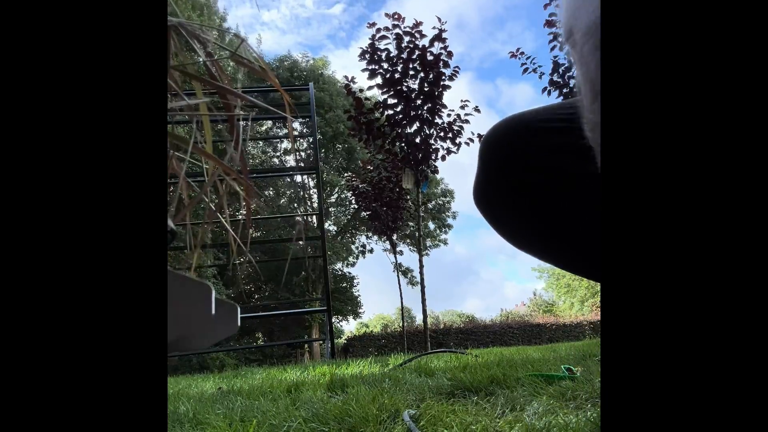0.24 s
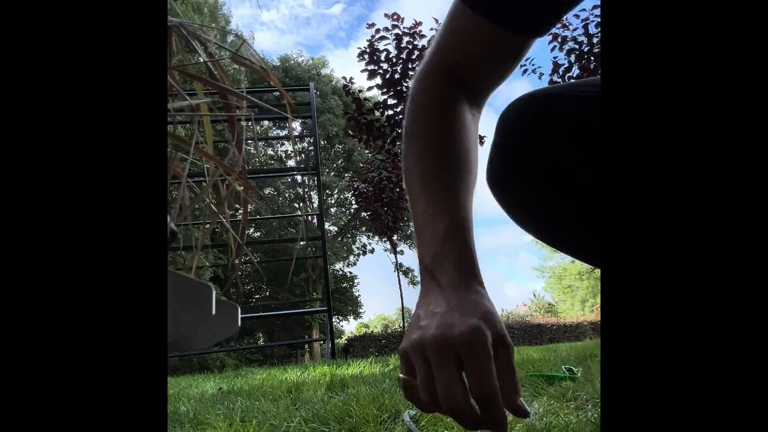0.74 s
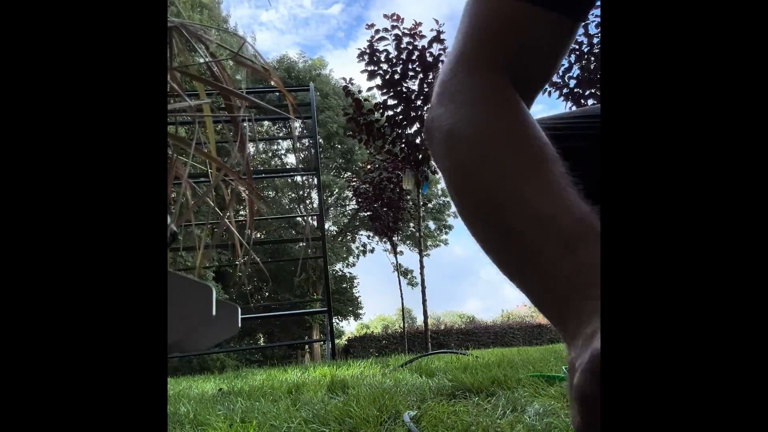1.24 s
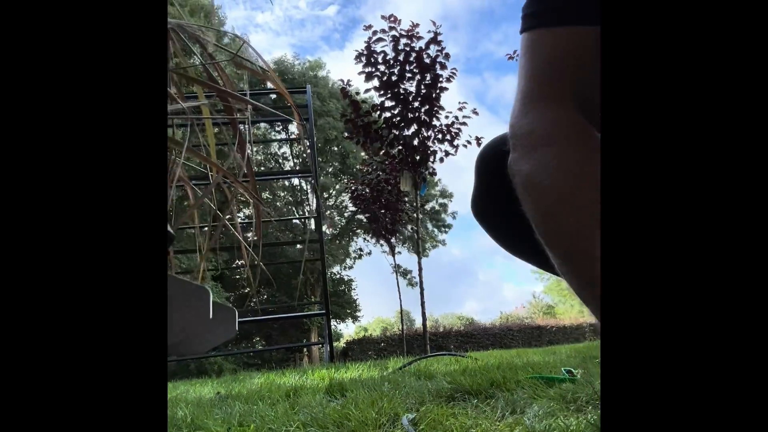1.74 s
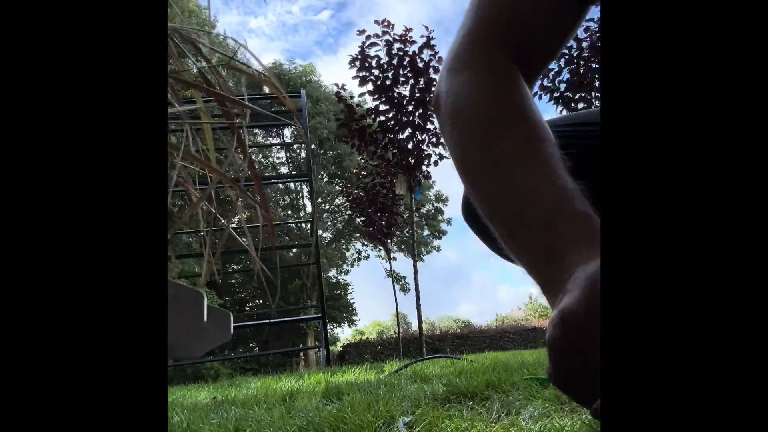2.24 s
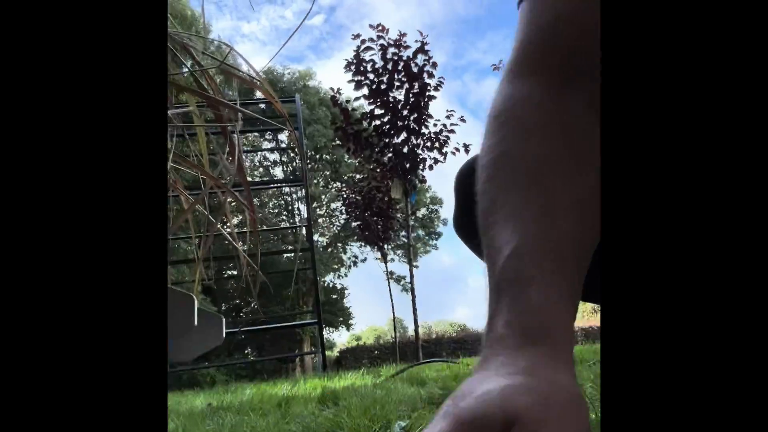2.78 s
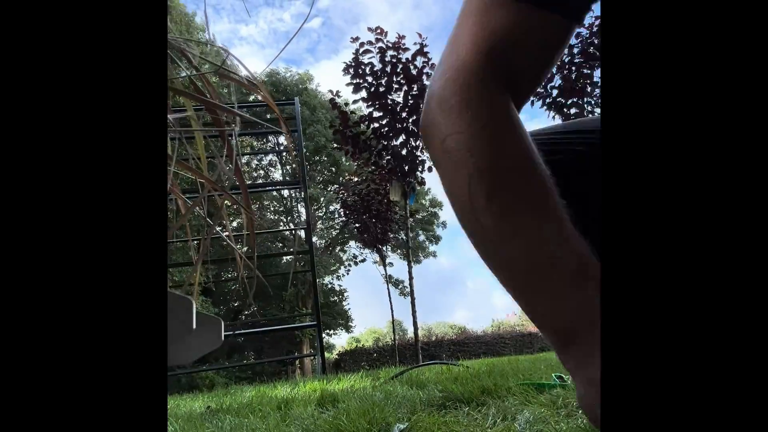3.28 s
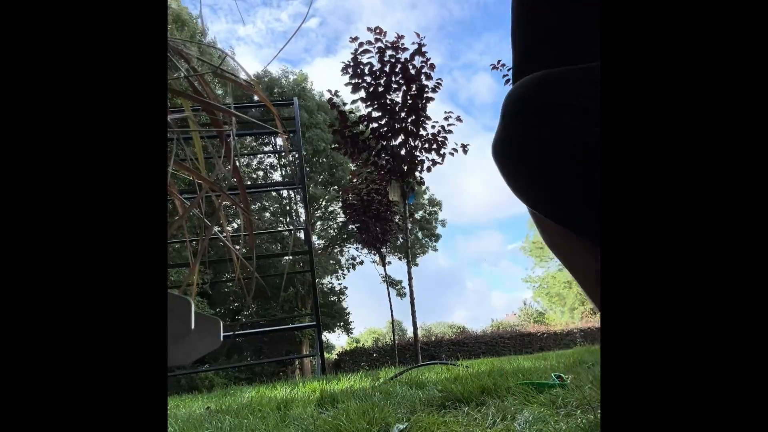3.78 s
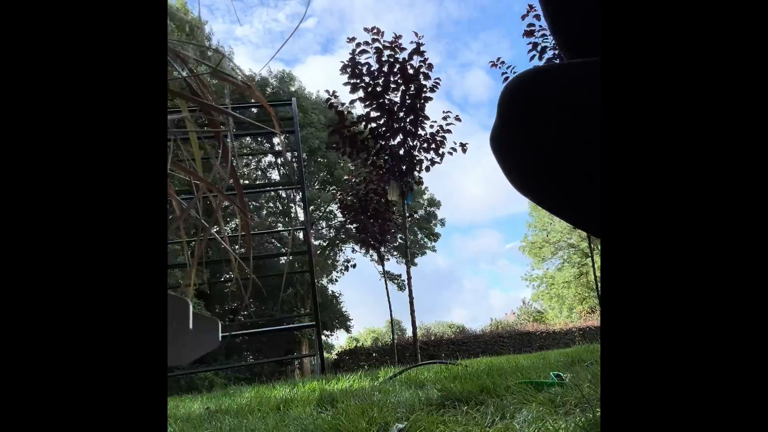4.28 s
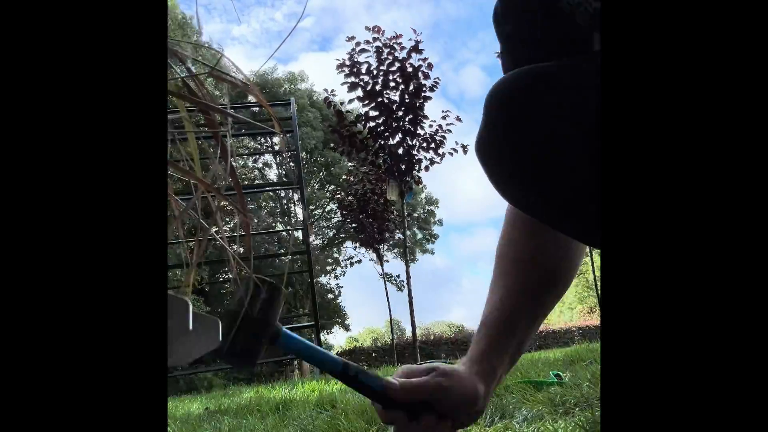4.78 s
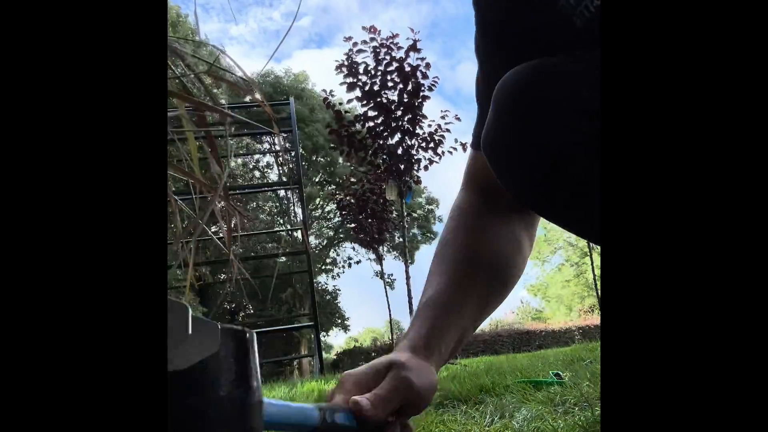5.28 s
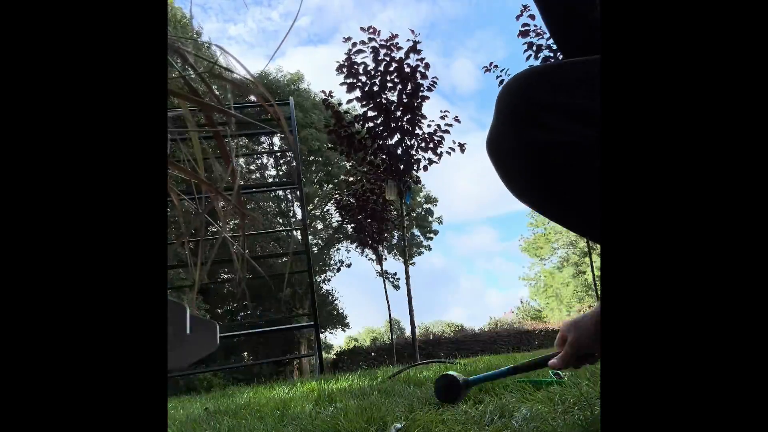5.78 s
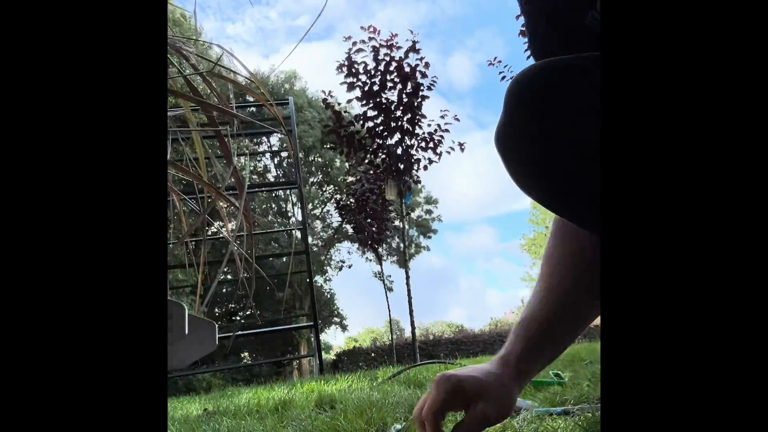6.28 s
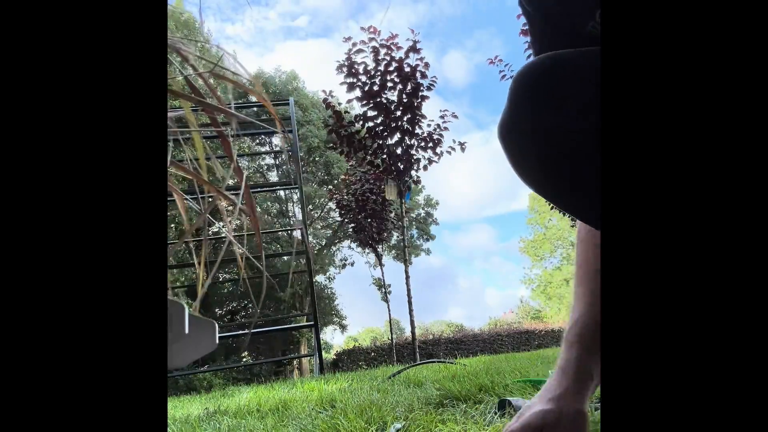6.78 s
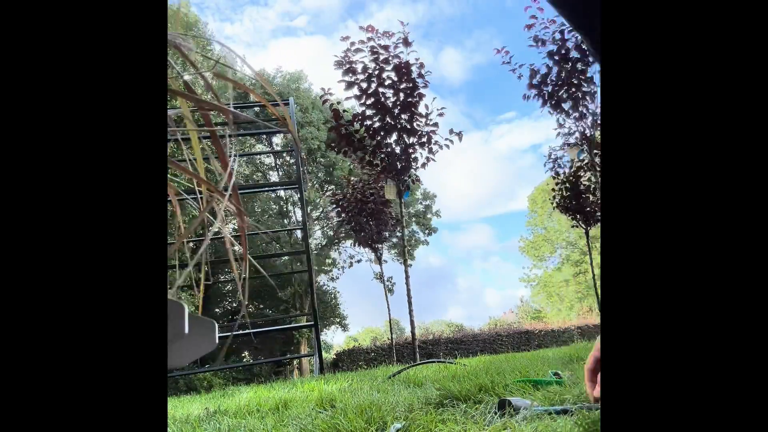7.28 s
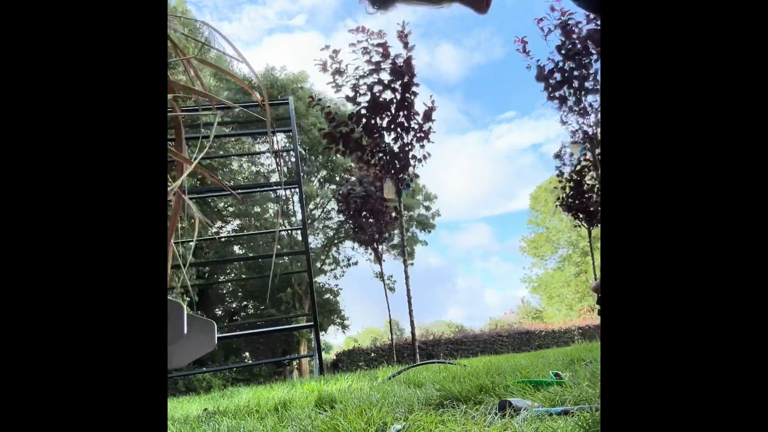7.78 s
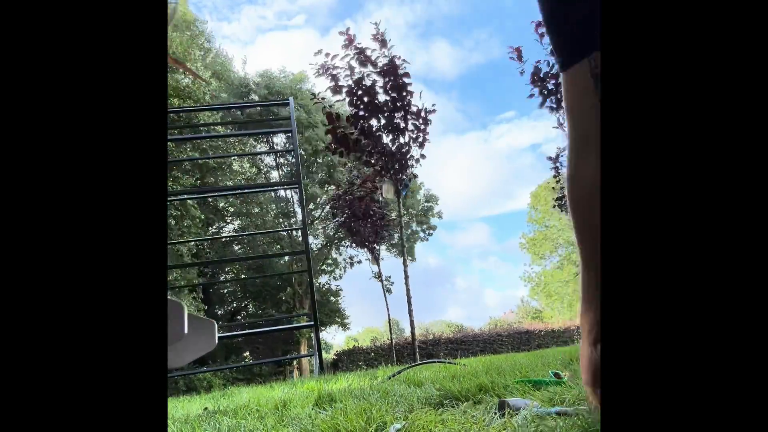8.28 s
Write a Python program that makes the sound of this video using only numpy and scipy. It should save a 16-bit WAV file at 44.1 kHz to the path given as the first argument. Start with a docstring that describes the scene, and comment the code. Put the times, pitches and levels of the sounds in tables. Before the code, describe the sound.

Quick bursts of hollow, cracking mallet blows on pegs in turf, small ticks between, then quiet grass handling and flapping wind noise at the end.

```python
"""Close to a small stereo microphone in the grass, pegs and grass first tick and rustle as clicks and grains.
Then a mallet taps plastic pegs into a lawn in quick runs: each blow rings modes of peg and head as a dry
crack, a snap and a hollow knock, with noisy crunch and a sagging thud of turf; ticks and soft pats fall between.
Fainter ticks and strokes follow; at the end a gust buffets the ports as low noise, swings and flaps.
Far traffic and leaves, bands of flickering noise, last throughout."""
import sys
import numpy as np
from scipy import signal
from scipy.io import wavfile
from scipy.ndimage import uniform_filter1d

SR = 44100
rng = np.random.default_rng(int(sys.argv[2]) if len(sys.argv) > 2 else 0)


def unload_wav(signal):
    """Save mono or channel-first audio to the path in sys.argv[1] as 16-bit WAV at rate SR, clipped to [-1, 1]."""
    wavfile.write(
        sys.argv[1],
        SR,
        np.round(np.clip(np.atleast_2d(signal).T, -1, 1) * 32767).astype(np.int16),
    )


N = 376589  # samples


def from_db(db):
    """Logarithmic level: decibels to amplitude gain."""
    return 10 ** (np.asarray(db) / 20)


def rms_one(x):
    """Energy normalisation: scale all channels together to rms 1."""
    return x / np.sqrt(np.mean(x ** 2) + 1e-20)


def peak_one(x):
    """Peak normalisation: scale each channel to peak 1."""
    return x / np.abs(x).max(-1, keepdims=True)


def level_in_time(rows, outside_db=None):
    """Linear interpolation of level: one value in dB for each sample."""
    time_s, level_db = np.transpose(rows)
    return np.interp(np.arange(N) / SR, time_s, level_db, outside_db, outside_db)


def at_hz(points, hz):
    """Logarithmic frequency: read a spectrum between its points on a log axis."""
    point_hz, value = np.transpose(points)
    return np.interp(np.log(hz), np.log(point_hz), value)


def band(x, low_hz, high_hz):
    """Band limitation: a Butterworth band-pass."""
    return signal.sosfilt(signal.butter(2, [low_hz, high_hz], "band", fs=SR, output="sos"), x)


def drift(corner_hz):
    """Low-passed chance: noise through two equal poles, drawn every 40 samples and scaled to rms 1."""
    step, settle = 40, 2000
    pole = np.exp(-2 * np.pi * corner_hz * step / SR)
    steps = rng.standard_normal(N // step + settle + 2)
    slow = signal.lfilter([1], [1, -2 * pole, pole * pole], steps)[settle:]
    return np.interp(np.arange(N) / step, np.arange(len(slow)), rms_one(slow))


def ring(x, hz, t60_s):
    """Damped resonance: one mode that decays by 60 dB in its t60."""
    radius = from_db(-60 / (t60_s * SR))
    angle = 2 * np.pi * hz / SR
    return signal.lfilter([0, np.sin(angle)], [1, -2 * radius * np.cos(angle), radius * radius], x)


def contact(rise_ms, alike):
    """Contact force: a gritty push that swells and dies, partly its own in each channel."""
    t = np.arange(2600) / SR * 1000 / rise_ms
    shared, own = rng.standard_normal(len(t)), rng.standard_normal((2, len(t)))
    alike = np.clip(alike, 0, 1)  # share of the power common to both channels
    return t * np.exp(-t) * (np.sqrt(alike) * shared + np.sqrt(1 - alike) * own)


def struck(push, modes, level_db):
    """Modal superposition: a push excites each mode with a chance strength; the sum peaks at the level."""
    sound = 0
    for hz, mode_db, t60_s in modes:
        strength_db = mode_db + rng.normal(0, 1.5)
        sound = sound + from_db(strength_db) * peak_one(ring(push, hz, t60_s))
    return from_db(level_db) * peak_one(sound)


def thump(hz, rise_cycles, level_db, glide):
    """Yielding ground: a soft swing starts high, sags to its pitch as the give sets in, and is soon damped."""
    turn = np.arange(2600) / SR * hz
    rise = turn / rise_cycles
    envelope = rise * np.exp(1 - rise)
    sagging_turn = turn + glide * (1 - np.exp(-turn))
    return from_db(level_db) * envelope * np.sin(2 * np.pi * sagging_turn)


LAG_MS_PER_DB = 0.08  # arrival gap between the ports for each dB of pan


def add(out, s, sound, pan_db=0):
    """Level and arrival difference: a sound is louder at the nearer port and reaches it first."""
    length = sound.shape[-1]
    stereo = np.broadcast_to(sound, (2, length))
    for side, sign in enumerate((1, -1)):
        at = round((s - sign * pan_db * LAG_MS_PER_DB / 2000) * SR)
        out[side, at:at + length] += from_db(sign * pan_db / 2) * stereo[side, :N - at]


# Settings for each run of blows or single blow, with glancing blows in rows of their own;
# knock and crunch are set against the crack level. Columns:
# start_s, pan_left_over_right_db, knock_hz, knock_db, crunch_db, crunch_rise_ms, crunch_fall_ms,
# contact_rise_ms, thud_rise_ms
BLOW_SETTINGS = [(1.2, -2, 655, -15, -17.5, 2, 7, 0.31, 3.9),
                 (1.5, 1.8, 385, -9, -11.5, 1.34, 9.1, 0.48, 3.4),
                 (2.05, 1.7, 385, -10.5, -10, 2.7, 11.2, 0.89, 4.15),
                 (2.4, 4, 542, -12, -23, 4.9, 5.7, 0.46, 3.1),
                 (3.0, -0.5, 480, -17, -16.5, 1.9, 4.7, 0.8, 4.3),
                 (3.4, -0.64, 560, -5, -17.5, 2.9, 6.3, 0.63, 4.2),
                 (4.1, -1, 374, -8.5, -14.5, 1.4, 3.8, 0.44, 4.1),
                 (4.6, 5, 770, -8, -19.5, 2.9, 6.2, 0.28, 3.95),
                 (5.1, 6, 464, -12.5, -1, 3.7, 4.2, 0.92, 4), (5.3, 5.5, 600, -21, -15, 3.6, 5, 0.45, 4.1)]


def settings_at(s):
    """Piecewise constancy: the row of settings in force at a given time."""
    return [row for start_s, *row in BLOW_SETTINGS if start_s < s][-1]


# Mallet blows, levels before panning. Columns:
# time_s, crack_peak_db, crack_hz, snap_peak_db, thud_db, thud_hz
BLOWS = [(1.2823, -14.5, 1170, -16.5, -20, 248), (1.4106, -8.5, 2280, -9.5, -16, 233),
         (1.5373, -2, 1010, -12, -7, 186), (1.663, -4.5, 2020, -18, -3, 186),
         (1.7842, -3, 2260, -22, -3, 179), (1.9411, -2, 2230, -7.5, -4.5, 175),
         (2.0855, -6, 2850, -11, -3.5, 170.3), (2.4962, -3.5, 2170, -14.5, -14, 151),
         (2.6154, 0, 1840, -28, -13, 166), (2.748, 1, 1860, -51, -12, 164),
         (3.0832, -8, 2200, -0.5, -23, 233), (3.1967, -2.5, 1550, -80, -16.5, 202),
         (3.4525, -29.5, 1210, -19, -23, 180), (3.578, -27.5, 1190, -11.5, -18, 181),
         (3.7046, -24, 1200, -23, -14, 170), (3.841, -18, 2220, -16, -15, 166),
         (4.154, 1.5, 1240, -21, -15.5, 169), (4.2836, -2.5, 2340, -29, -13, 168),
         (4.3983, -3, 2230, -30, -16, 148), (4.6866, 2.5, 2230, -23, -15, 155),
         (4.8111, 4.5, 3640, -17, -12, 141), (4.9494, 1.5, 3800, -26, -13, 145.5),
         (5.2035, -11.5, 3830, -4, -26.5, 210), (5.334, -2.5, 1830, -10.5, -19.5, 163)]
# Modes of the peg in the crack. Columns: pitch_hz, level_db, t60_s
PEG_MODES = [(1214, -13, 0.0049), (1440, -30.5, 0.016), (2113, -14, 0.017), (2610, -1.5, 0.0024),
             (4180, -13, 0.0061), (4550, -18.5, 0.021)]
# Modes of the brief snap, heard in the ticks too. Columns: pitch_hz, level_db, t60_s
SNAP_MODES = [(7480, 12.5, 0.0013), (9350, -2.5, 0.00052), (11560, 2.5, 0.0048), (14800, -24, 0.0026)]
# Hollow ring of the head in the knock. Columns: pitch_hz, level_db, t60_s
HEAD_MODES = [(610, -18, 0.049), (830, -29.5, 0.0034)]


def mallet():
    """Impact excitation: each blow rings peg and head, crushes grass and soil, and swings the turf."""
    out = np.zeros((2, N))
    for s, crack_db, crack_hz, snap_db, thud_db, thud_hz in BLOWS:
        pan_db, knock_hz, knock_db, crunch_db, rise_ms, fall_ms, contact_ms, thud_rise_ms = settings_at(s)
        crack = struck(contact(contact_ms, alike=0.63), PEG_MODES + [(crack_hz, 0, 0.007)], crack_db)
        snap = struck(contact(0.14, alike=0.93), SNAP_MODES, snap_db)
        knock_modes = HEAD_MODES + [(knock_hz, 0, 0.021)]
        knock = struck(contact(0.61, alike=0.86), knock_modes, crack_db + knock_db)
        add(out, s, crack + snap + knock, pan_db)
        add(out, s - 0.015, crunch(crack_db + crunch_db, rise_ms, fall_ms, crack_hz), pan_db)
        add(out, s + 0.0003, turf_thud(thud_hz, thud_rise_ms, thud_db))
    return out


def crunch(level_db, rise_ms, fall_ms, crack_hz):
    """Granular failure: grass bends under the falling head, then soil grains give way round the peg."""
    ms = np.arange(3000) / SR * 1000 - 15  # the blow lands 15 ms in
    shape = np.exp(np.minimum(ms / rise_ms, -ms / fall_ms))
    grains = from_db(5 * np.repeat(rng.standard_normal(75), 40))  # uneven level every 40 samples
    grit = (rng.standard_normal(len(ms)) + 0.4 * rng.standard_normal((2, len(ms)))) * grains
    bright_share = 0.1 * (crack_hz / 2000) ** 1.5  # a higher crack crunches brighter
    bright = bright_share * rms_one(band(grit, 2240, 5730)) * shape ** 3.9  # the treble dies first
    return from_db(level_db) * shape * (rms_one(band(grit, 506, 3930)) + bright)


def turf_thud(hz, rise_ms, level_db):
    """Damped ground motion: the turf swings, and deeper soil swings slowly under it."""
    turf = thump(hz, rise_ms / 1000 * hz, level_db, glide=0.14)
    soil = thump(119.7, 0.97, level_db - 20, glide=0.5)
    return (turf + soil) * from_db([[-0.8], [0.8]])  # both ports move together, the right a little more


# Ticks of pegs, wire and grass stalks, levels before filtering. Columns:
# time_s, low_part_db, low_part_hz, treble_over_low_db
TICKS = [(0.377, -33, 1970, -12), (0.805, -27.5, 2600, -1), (0.815, -30, 3590, -6),
         (0.842, -25, 3700, 11.5), (0.8505, -24, 3250, -3), (0.861, -19, 1590, 6), (0.8753, -45, 3520, 5),
         (0.885, -20, 2620, 6), (0.9076, -29.5, 1950, 14), (1.5587, -19, 2920, -2), (1.6823, -24, 3250, -5),
         (1.807, -25, 2260, -4), (1.8144, -26, 2980, -8), (1.9806, -21.5, 3020, 0.5),
         (2.107, -22, 3000, -4), (2.1157, -23, 3195, -6), (2.5124, -24, 1600, -22),
         (2.5234, -36, 1560, -13), (2.633, -20, 2010, -24), (2.6433, -30, 1510, -21),
         (2.773, -28, 1530, -17), (3.1233, -30.5, 2550, -21), (4.1844, -22.5, 3120, 7),
         (4.3088, -21, 4070, 0), (4.433, -25.5, 4060, 0.5), (4.6447, -27, 1560, -5), (4.716, -28, 3140, 4),
         (4.7237, -29.5, 3270, -5), (4.7387, -26, 1990, -2), (4.8324, -31, 3200, 3),
         (4.8449, -25.5, 3150, 3), (4.8537, -32, 3290, 1), (4.9836, -25.5, 3320, 1), (5.022, -36, 4000, -6),
         (5.033, -20, 2400, 1), (5.048, -29.5, 2210, -5.5), (5.223, -31, 2010, -8), (5.36, -31, 3170, -3),
         (6.558, -37, 2300, 0), (6.7344, -42, 3040, 4), (6.8833, -31.5, 3230, 9),
         (6.9364, -34.5, 2420, 12.5), (6.9503, -34, 3310, 1), (6.9691, -34, 4250, 10),
         (7.174, -43, 4010, 19.5), (7.754, -45, 2460, 18), (7.7635, -49, 4020, 16), (7.7742, -46, 4000, 19),
         (7.837, -38.5, 4330, 21), (7.8644, -39.5, 4130, 22)]
WORK_ENDS_S, IDLE_PAN_DB = 5.5, -0.5  # before and after the tapping the hands are near the middle


def ticks():
    """Light impact: a small push rings short low and high modes into a dry click."""
    out = np.zeros((2, N))
    for s, low_db, hz, treble_db in TICKS:
        push = contact(0.5, alike=0.7)
        low = band(struck(push, [(hz, 0, 0.0025), (3800, -6, 0.002)], low_db), 800, 7300)
        high = struck(push, SNAP_MODES + [(7400, 3, 0.004)], low_db + treble_db)
        at_work = BLOW_SETTINGS[0][0] < s < WORK_ENDS_S
        pan_db = settings_at(s)[0] if at_work else IDLE_PAN_DB
        add(out, s - 0.0005, low + band(high, 8000, 12000), pan_db)
    return out


# Hand or handle set down softly on the turf, or the head bouncing back onto it. Columns:
# time_s, level_db, pitch_hz
SOFT_PATS = [(0.808, -30, 193), (0.893, -36, 190), (1.219, -33, 168), (2.521, -31, 230),
             (2.636, -23.5, 262), (2.77, -24.5, 246), (3.108, -51, 198)]


def pats():
    """Soft impact: a slow press swings the turf as a low bump."""
    out = np.zeros((2, N))
    for s, level_db, hz in SOFT_PATS:
        add(out, s, thump(hz, 0.0027 * hz, level_db, glide=0.11))  # rises in 2.7 ms
    return out


def swell(s, rise_s, fall_s):
    """Exponential growth and decay: gain climbs to 1 at a time and sinks again, straight in decibels."""
    span_db = 32.5  # change within one rise or fall time
    gain = np.zeros(N)
    first, last = max(int((s - 2 * rise_s) * SR), 0), min(int((s + 2 * fall_s) * SR), N)
    near = np.arange(first, last)
    t = near / SR - s
    gain[near] = from_db(span_db * np.minimum(t / rise_s, -t / fall_s))
    return gain


# Strokes of the hand through grass, the last a long stir of grass in the gust. Columns:
# loudest_s, low_part_db, treble_over_low_db, rise_s, fall_s
GRASS_STROKES = [(0.848, -37, -4, 0.066, 0.2), (0.97, -55, -14, .15, 0.083), (5.028, -41, -13, .02, 0.14),
                 (6.536, -53.5, -11, .06, 0.1), (6.76, -47.5, -8, 0.072, 0.056),
                 (6.954, -48, -7, .09, 0.13), (7.28, -78, 18, 0.7, 0.21),
                 (7.761, -60.5, 27.5, 0.015, 0.037), (7.862, -56.5, 18, 0.051, 0.012),
                 (8.4, -69, 17.5, 1.9, 1.5)]


def rustle():
    """Dense random impacts: blades of grass flick past the skin as grains of uneven size."""
    sizes_db = 4 * np.minimum(rng.exponential(1, (2, N)), 5)
    signs = rng.choice([-1, 1], (2, N))
    present = rng.random((2, N)) < 1800 / SR  # about 1800 grains per second in each channel
    grains = from_db(sizes_db) * signs * present
    low, high = rms_one(band(grains, 1600, 4700)), rms_one(band(grains, 6500, 14500))
    out = np.zeros((2, N))
    for s, low_db, treble_db, rise_s, fall_s in GRASS_STROKES:
        out += from_db(low_db) * swell(s, rise_s, fall_s) * (low + from_db(treble_db) * high)
    return out


# Low noise of the gust between its buffets. Columns: time_s, level_db
GUST_LEVEL = [(6.85, -74), (6.91, -64), (7.42, -54.5), (7.9, -41), (8.0, -34), (8.36, -49), (8.54, -38)]
# Single buffets of the gust. Columns: time_s, swing_db, swing_hz, upper_over_swing_db
GUST_BUFFETS = [(7.45, -29, 130, -12), (7.748, -36, 114, -19), (7.857, -26.5, 166, -13),
                (7.951, -21, 150, -14), (7.978, -21.5, 140, -10), (8.006, -16.5, 124, -15),
                (8.058, -17.5, 185, -16), (8.095, -18.5, 218, -27), (8.1084, -8.5, 154, 1.5),
                (8.177, -19.5, 149, -3), (8.203, -23.5, 180, -6), (8.233, -26, 150, 7),
                (8.316, -23, 150, 5), (8.337, -27, 130, -4), (8.389, -14.5, 163, 2),
                (8.433, -18.5, 132, -3), (8.449, -19, 158, -1.5), (8.482, -28, 215, 10.5),
                (8.497, -27, 167, 8)]
WAKE_DB, WAKE_UPPER_DB = -7, -8  # noise round each buffet against its swing and its upper part
FLAP_MODES = [(312, 0.0, 0.0049), (624, -10.5, 0.0084), (1050, -35, 0.0055)]  # pitch_hz, level_db, t60_s


def wind():
    """Turbulent pressure: lumpy noise at the ports with hard buffets, its upper part less alike left and right."""
    shared, own = rng.standard_normal(N), rng.standard_normal((2, N))
    low = rms_one(band(shared + 0.3 * own, 71, 160))
    lumps = from_db(4 * drift(40))
    upper = rms_one(band(band(shared + 1.8 * own, 240, 840), 200, 1140) * lumps)
    upper = signal.sosfilt(signal.butter(4, 1300, fs=SR, output="sos"), upper)
    low_gain, upper_gain = from_db(level_in_time(GUST_LEVEL, outside_db=-93)), 0
    out = np.zeros((2, N))
    for s, swing_db, hz, upper_db in GUST_BUFFETS:
        wake = from_db(swing_db + WAKE_DB) * swell(s + 0.0079, rise_s=0.029, fall_s=0.014)
        low_gain = low_gain + wake
        upper_gain = upper_gain + wake * from_db(upper_db + WAKE_UPPER_DB)
        flap = struck(contact(1.32, alike=0.68), FLAP_MODES, swing_db + upper_db)
        flap = band(band(flap, 170, 850), 128, 1040)
        add(out, s, thump(hz, 0.39, swing_db, glide=0.36) + flap)
    return out + low_gain * low + upper_gain * upper


# Left-right likeness of the background, 1 for same and -1 for opposite. Columns: pitch_hz, correlation
PORT_LIKENESS = [(60, 0.98), (130, 1.0), (290, 0.98), (640, 0.88), (1410, -0.22), (3100, -0.22),
                 (6820, -0.21), (15000, -0.046)]


def far_noise(spectrum, patchy_db):
    """Partial coherence: third-octave noise bands, each with its level, flicker and likeness; rms 1."""
    out, together = 0, drift(17.0)
    low_end, high_end = np.log(spectrum[0][0]), np.log(spectrum[-1][0])
    edges = np.exp(np.arange(low_end, high_end + 0.2, np.log(2) / 3))
    white = rng.standard_normal((2, 2, N))  # two noise pairs, used by alternate bands
    for k, (low_hz, high_hz) in enumerate(zip(edges, edges[1:])):
        mid, side = band(white[k % 2], low_hz, high_hz)
        hz = np.sqrt(low_hz * high_hz)
        alike = np.clip(at_hz(PORT_LIKENESS, hz), -1, 1)
        flicker_db = patchy_db * (0.19 * together + drift(27.0))
        stereo = np.sqrt(1 + alike) * mid + np.sqrt(1 - alike) * side * [[1], [-1]]
        out = out + from_db(at_hz(spectrum, hz) + flicker_db) * stereo
    return rms_one(out)


# Background level as recorded, sinking after blows as the recorder turns down. Columns: time_s, level_db
BACKGROUND_LEVEL = [(0.0, -45.5), (2.4, -44), (2.66, -52), (3.0, -46.5), (3.21, -54.5), (3.64, -49.5),
                    (4.28, -44), (5.14, -46.5), (5.28, -55), (5.61, -52), (6.87, -53), (7.09, -49),
                    (7.75, -49.5), (8.42, -38.5), (8.54, -40.5)]
# Relative spectrum of the far rumble. Columns: pitch_hz, density_db_per_hz
RUMBLE_SPECTRUM = [(18, -74), (30, -53), (92, -4.5), (190, -1.5), (226, -4.5), (404, -8), (441, -12),
                   (722, -11), (1200, -26), (2000, -26), (2600, -69), (4400, -120)]
# Relative spectrum of the leaves. Columns: pitch_hz, density_db_per_hz
LEAF_SPECTRUM = [(590, -36), (1000, -3.5), (1220, -2.5), (1330, -8), (1820, -15.5), (2240, -2.5),
                 (2600, -8), (3540, -13), (5540, -8.5), (6290, -12.5), (8480, -12), (12400, -18.5),
                 (15600, -18.5)]
# A narrow hiss without flicker of its own. Columns: low_hz, high_hz, level_over_leaves_db
NARROW_HISS = (3470, 4290, -5.5)
LEAVES_DB, LEAVES_FOLLOW = -54, 0.7  # leaf level at mean background; share of the background's change in dB


def garden():
    """Diffuse background: far traffic and leaf hiss, sinking as the recorder turns down, the hiss only partly."""
    background_db = level_in_time(BACKGROUND_LEVEL)
    hiss_db = LEAVES_DB + LEAVES_FOLLOW * (background_db - background_db.mean())
    low_hz, high_hz, narrow_db = NARROW_HISS
    narrow = rms_one(band(rng.standard_normal((2, N)), low_hz, high_hz))
    hiss = far_noise(LEAF_SPECTRUM, patchy_db=0.3) + from_db(narrow_db) * narrow
    rumble = far_noise(RUMBLE_SPECTRUM, patchy_db=1.54)
    return from_db(background_db) * rumble + from_db(hiss_db) * hiss


def scene():
    """Linear superposition: all sources add at the microphone."""
    return mallet() + ticks() + pats() + rustle() + wind() + garden()


LAG_HZ, LOW_CUT_HZ, HIGH_CUT_HZ = 281, 85, 16900
GAIN_KNEE_DB, GAIN_SLOPE, GAIN_RELEASE_DB_S = -3, 0.083, 44  # slope: dB of cut per dB over the knee


def record(dry):
    """Dispersion and compression: filters delay the bass, gain ducks after loud blows, the top is cut."""
    dry = signal.sosfilt(signal.butter(3, LOW_CUT_HZ, "high", fs=SR, output="sos"), dry)  # wind filter
    w = np.tan(np.pi * LAG_HZ / SR)
    pole = (1 - w) / (1 + w)
    late = signal.sosfilt(np.tile([-pole, 1, 0, 1, -pole, 0], (5, 1)), dry)  # all-passes: lows arrive later
    power = uniform_filter1d((late ** 2).mean(0), size=441)  # over 10 ms
    level_db = 10 * np.log10(power + 1e-12)
    ramp_db = GAIN_RELEASE_DB_S * np.arange(N) / SR
    held_db = np.maximum.accumulate(level_db + ramp_db) - ramp_db  # peaks held, then released steadily
    cut_db = GAIN_SLOPE * np.maximum(held_db - GAIN_KNEE_DB, 0)
    cut_db = signal.lfilter([0.003], [1, -0.997], cut_db)  # the gain moves smoothly
    out = 0.84 * np.tanh(late * from_db(-cut_db) / 0.84)  # soft overload
    return signal.sosfilt(signal.cheby2(12, 70, HIGH_CUT_HZ, fs=SR, output="sos"), out)


dry = scene()
out = record(dry)
unload_wav(out)
```